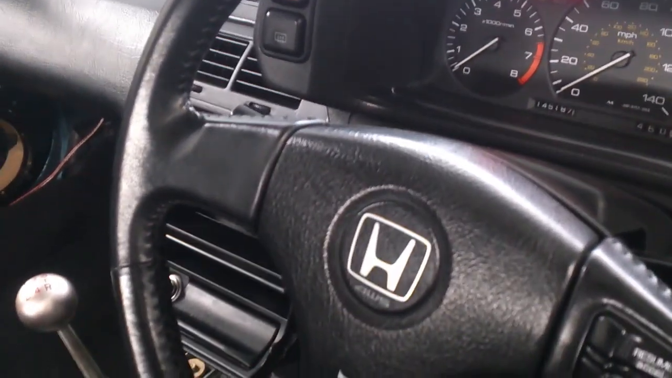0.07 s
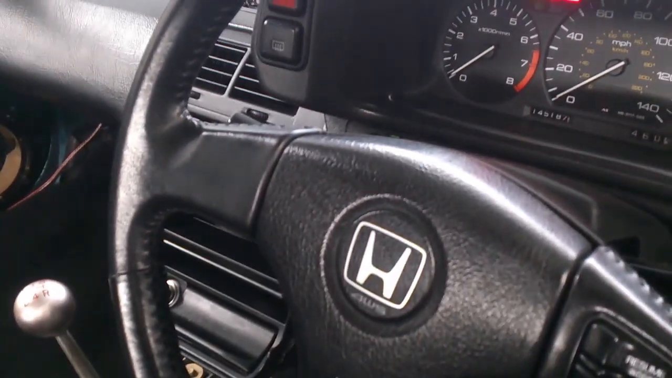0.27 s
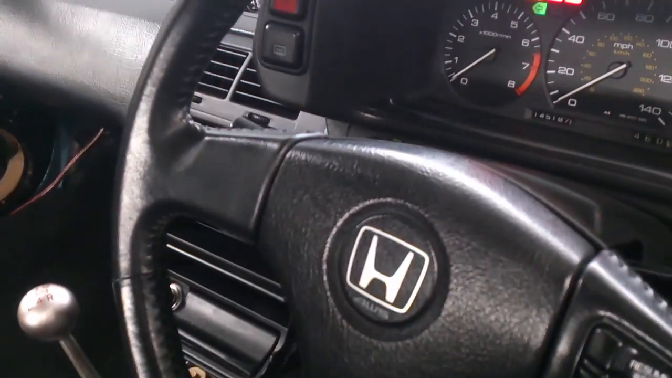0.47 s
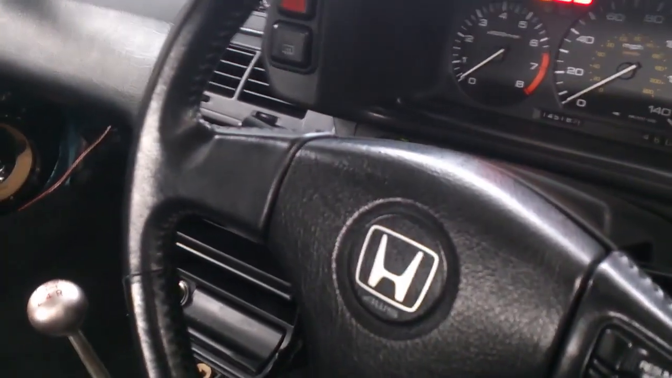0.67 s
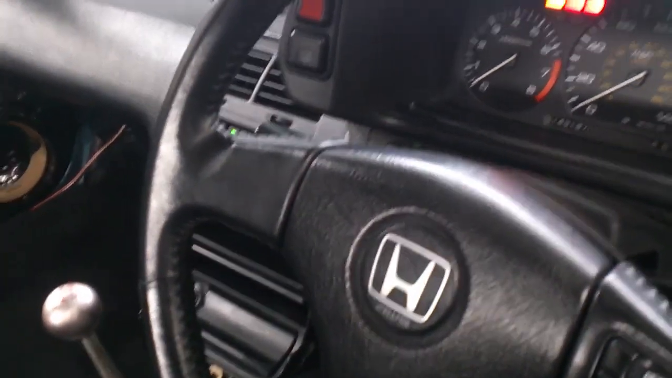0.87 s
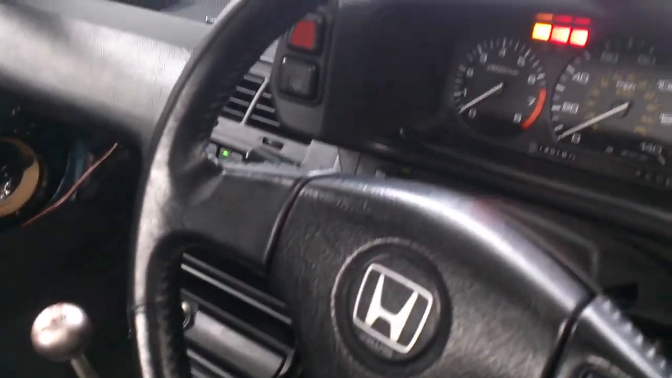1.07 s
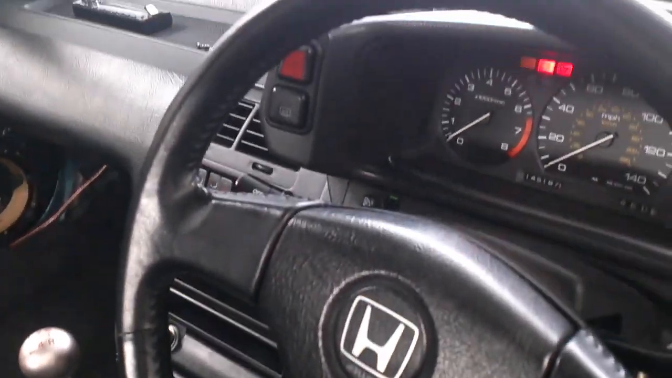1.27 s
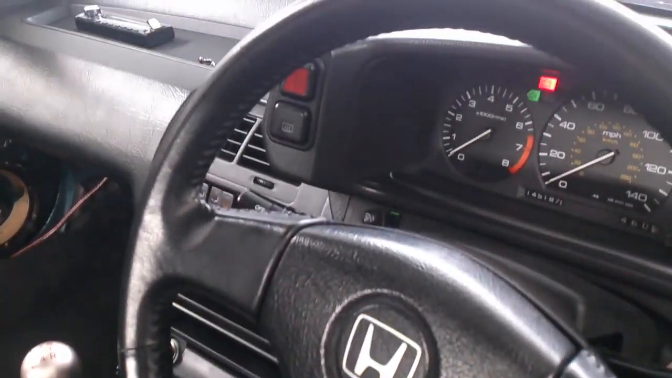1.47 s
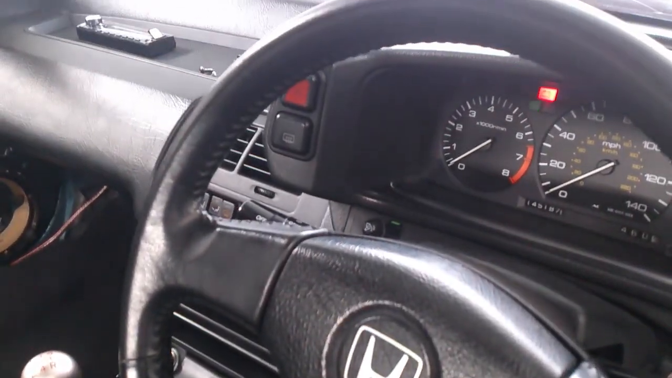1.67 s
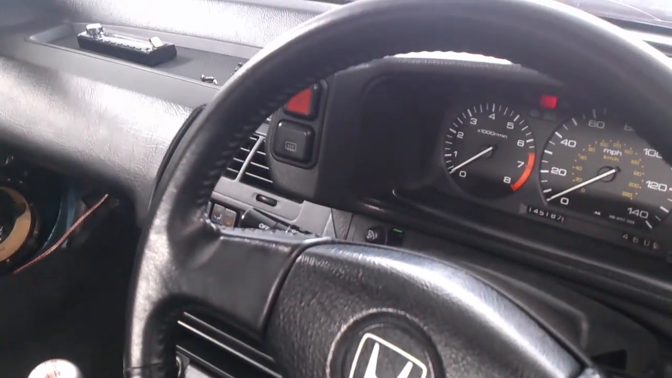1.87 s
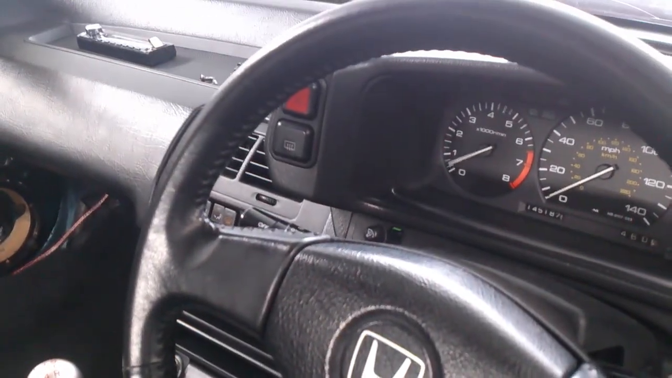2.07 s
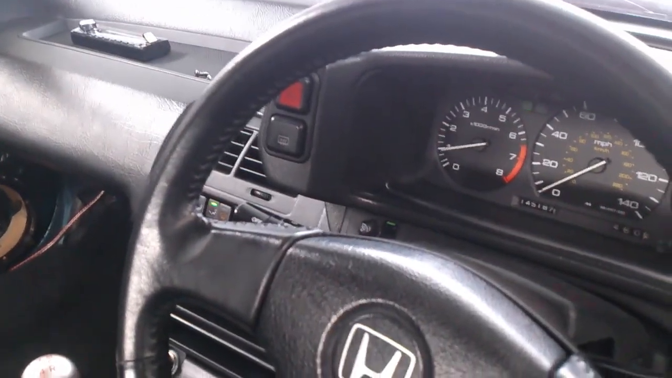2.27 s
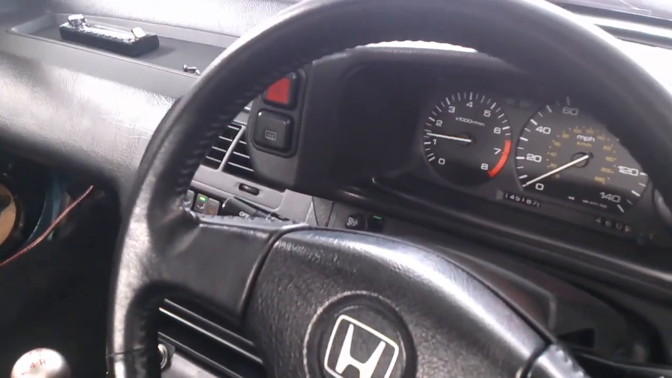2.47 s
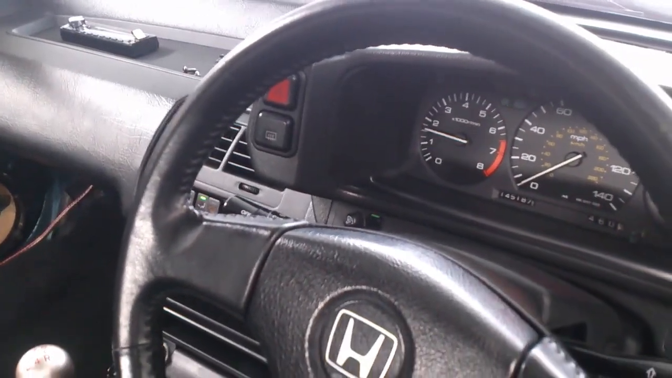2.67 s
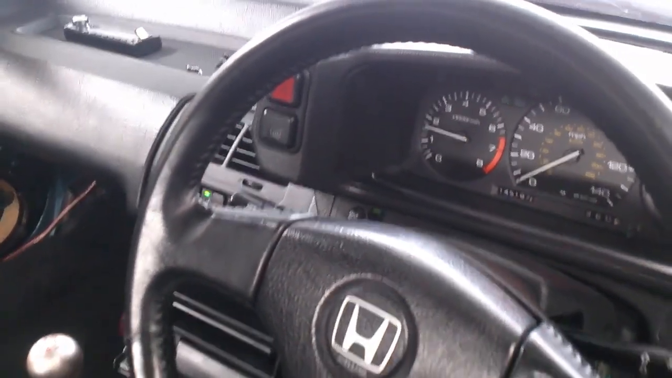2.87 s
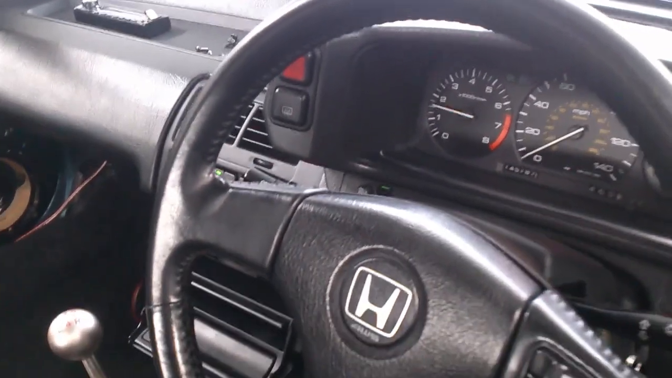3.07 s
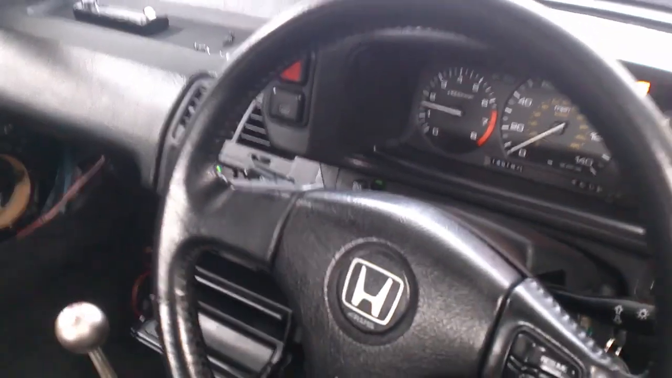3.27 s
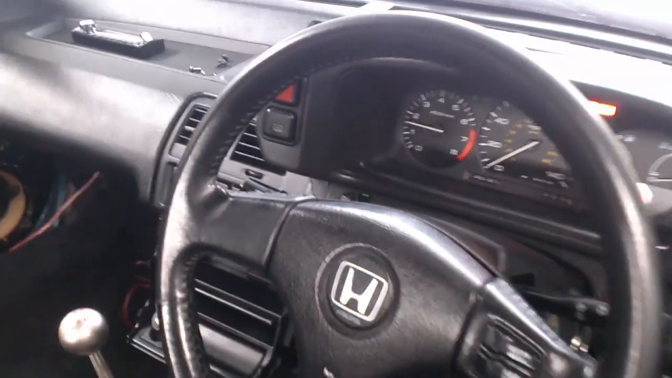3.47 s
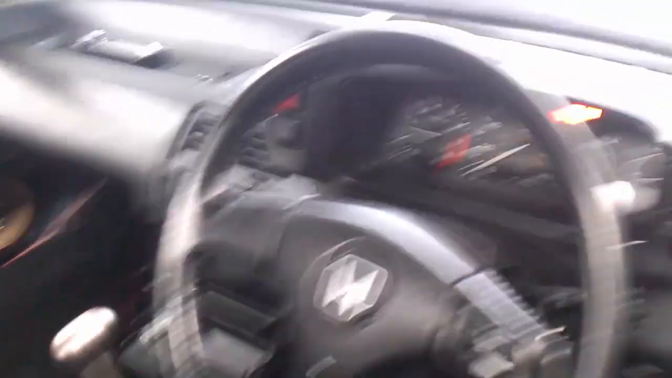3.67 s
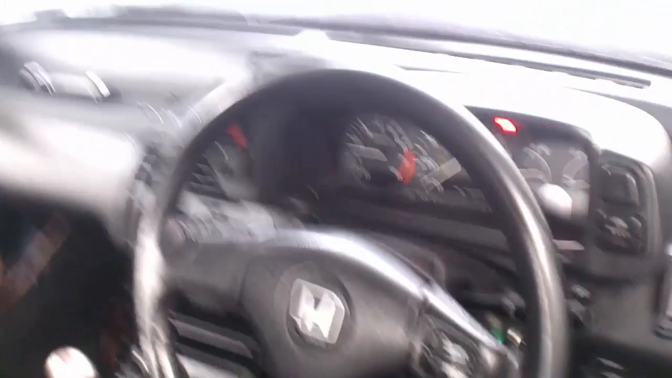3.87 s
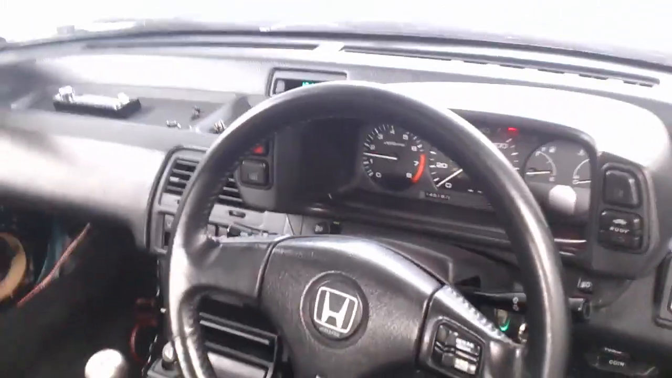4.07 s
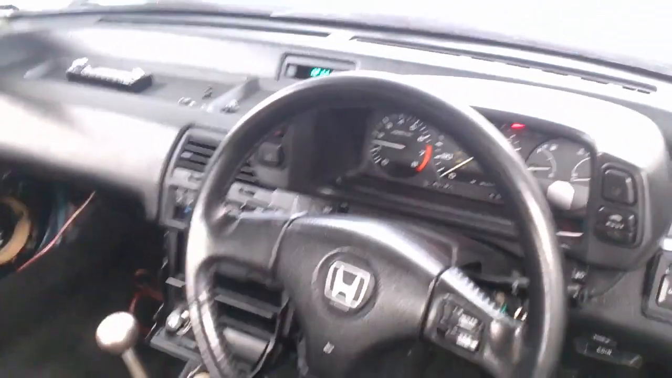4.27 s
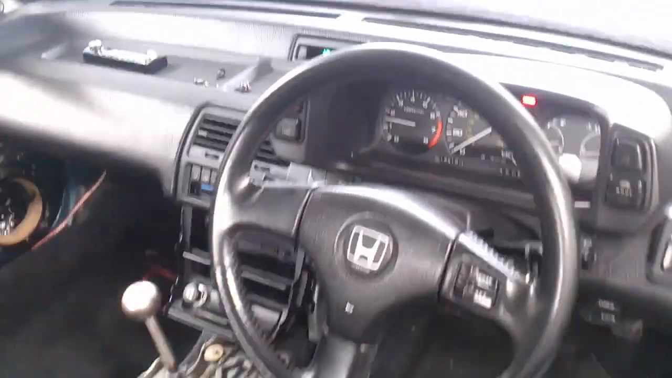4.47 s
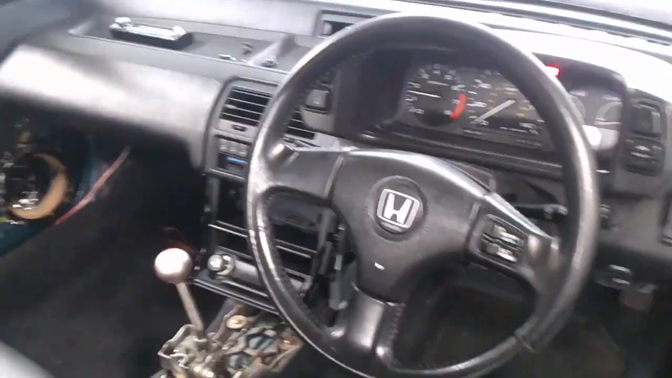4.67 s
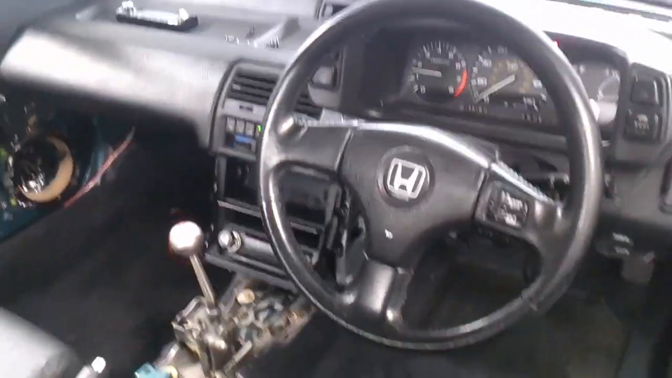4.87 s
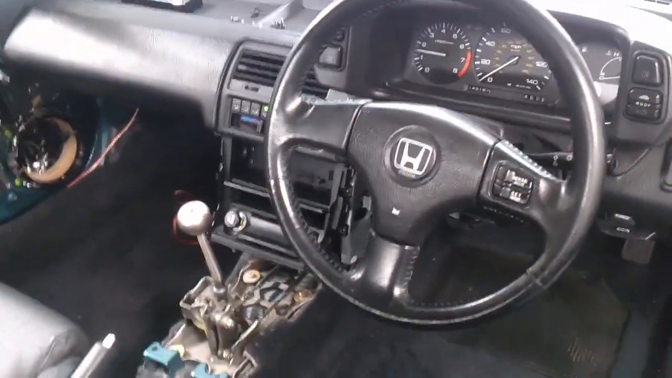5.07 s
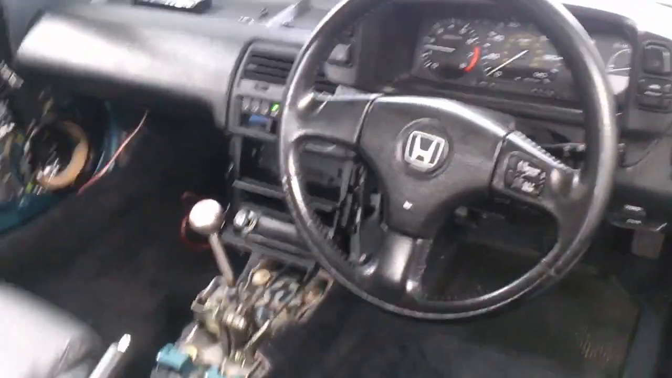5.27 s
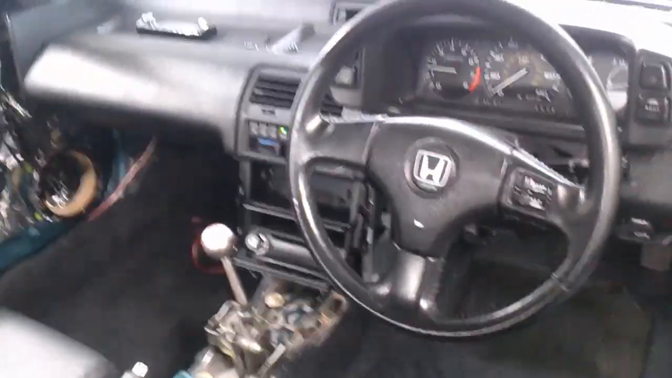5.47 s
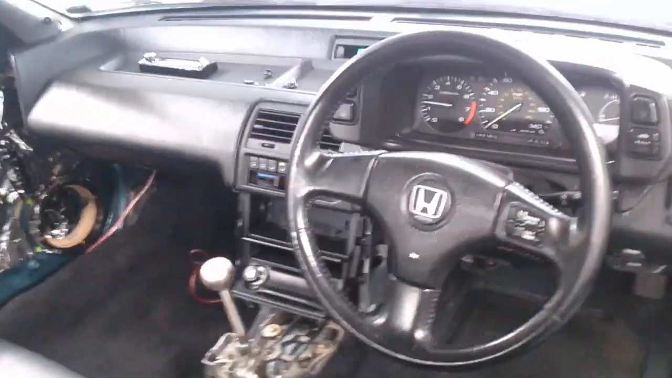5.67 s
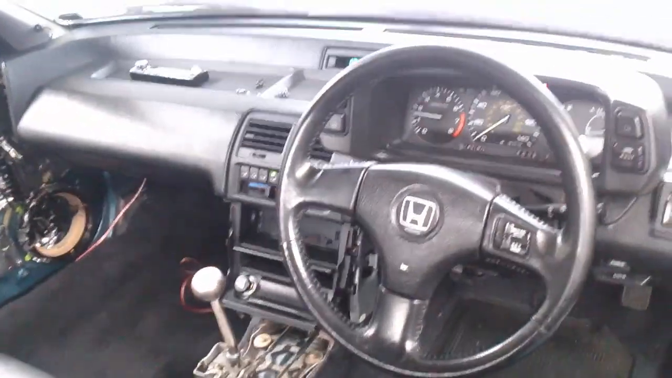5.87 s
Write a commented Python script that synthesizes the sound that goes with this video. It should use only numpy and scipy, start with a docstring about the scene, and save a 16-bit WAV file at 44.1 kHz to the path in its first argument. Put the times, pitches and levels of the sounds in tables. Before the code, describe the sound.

A key clicks, a starter cranks briefly, and a car engine stumbles, flares and settles into a booming fast idle, heard from inside.

```python
"""A key clicks round, a starter grinds through three compressions, and a cold four-cylinder petrol engine
stumbles, flares and settles into a booming fast idle. Driver's seat, hand-held stereo recorder, drawn back
from the dashboard during the idle. The firings pump the cabin air while exhaust and valves beat in step;
the starter's gear teeth whine and ring its housing. Close to the microphones, fingers knock and rub
on the recorder's case, over a faint hiss."""
import sys
import numpy as np
from scipy import signal
from scipy.fft import rfft, irfft, next_fast_len
from scipy.io import wavfile

SR = 44100
rng = np.random.default_rng(int(sys.argv[2]) if len(sys.argv) > 2 else 0)


def dump(signal):
    """Clip the signal to [-1, 1] and save it as 16-bit WAV at the path in sys.argv[1]."""
    limited = np.clip(np.atleast_2d(signal).T, -1, 1)
    pcm = np.round(limited * 32767).astype(np.int16)
    wavfile.write(sys.argv[1], SR, pcm)


N = 261511
TIME = np.arange(N) / SR

# the two microphone ports: (frequency [Hz], left minus right [dB], lead of the left [rad], likeness [0-1])
MIC_PORTS = [(24, 22, -1.5, 1), (54.3, 10, -1.08, 0.56), (113, 4, -1.04, 1), (202, 2, -1, 0.57),
             (470, 0.5, -0.2, 0.36), (1020, 1.5, -1.8, 1), (1930, -5, -2.5, 0), (4530, -6.5, -0.5, 0),
             (10600, -9, 2, 0), (16200, -11.5, 18, 1)]
# deep rumble of the rocking engine and of the case in the hand: (frequency [Hz], level [dB])
RUMBLE_SPECTRUM = [(4, -33), (11, -11), (18, -9), (28, 0), (45, -2.5), (70, -19), (130, -29.5), (300, -77)]
# strokes the starter labours through: (start [s], length [s], level [dB], whine [Hz], glide [Hz/s])
COMPRESSIONS = [(1.265, 0.11, -45.5, 883, 841), (1.43, 0.15, -44, 1584, -1100),
                (1.69, 0.065, -42.5, 1778, -3400)]

# phases of the start: (start [s], attack [s], hold [s], release t60 [s])
ENGAGE = (1.225, 0.017, 0.03, 0.19)   # the pinion bites
CRANK = (1.23, 0.044, 0.53, 0.76)     # the starter turns the engine
GULP = (1.729, 0.48, 0.023, 0.33)     # air rushes into the manifold
FLARE = (1.8, 0.15, 0.76, 2.1)        # the engine pulls hard, then eases to idle
STUMBLE = (1.877, 0.1, 0.3, 2.7)      # it fires unevenly
OVERRUN = (1.95, 0.38, 0.22, 0.59)    # it throws the starter off to spin down
# gradual changes: (start [s], length [s])
CATCH = (1.788, 0.25)       # the engine comes up to strength
DRAW_BACK = (3.3, 1.12)     # the recorder moves from the dashboard into the cabin
TONES_GROW = (4.38, 0.63)   # the steady tones of the idle come forward
LABOUR_T60_S = 0.26         # decay after each compression


def from_db(db):
    """Decibels to gain."""
    return 10 ** (np.asarray(db) / 20)


def rms_one(x):
    """Scale to rms 1."""
    return x / np.sqrt(np.mean(x ** 2) + 1e-20)


def together(*gains):
    """Unrelated vibrations add in power."""
    return np.sqrt(sum(gain ** 2 for gain in gains))


def ramp(start, length):
    """From 0 to 1 in a straight line."""
    return np.clip((TIME - start) / length, 0, 1)


def swell(start, attack, hold, t60):
    """Gain that rises, holds and dies away."""
    return ramp(start, attack) * from_db(-60 * np.maximum(TIME - start - attack - hold, 0) / t60)


def at_hz(rows, hz, column=1):
    """One column of a table, read on a log-frequency axis."""
    columns = np.transpose(rows)
    return np.interp(np.log(hz), np.log(columns[0]), columns[column])


def filtered(x, response):
    """Apply a frequency response, given as a function of Hz."""
    size = next_fast_len(N + 4096)
    hz = np.maximum(np.arange(size // 2 + 1) * SR / size, 1)
    return irfft(rfft(x, size) * response(hz), size)[..., :N]


def drift(rate_hz):
    """Random wander of rms 1, mostly slower than rate_hz."""
    return rms_one(filtered(rng.standard_normal(N), lambda hz: 1 / (1 + (hz / rate_hz) ** 2) ** 2))


def white():
    """Two unrelated white noises."""
    return rng.standard_normal((2, N))


def coloured(pair, spectrum):
    """Two unrelated signals given a spectrum, and made alike at the low end as in a small cabin; rms 1."""
    def weight(hz):
        alike = at_hz(MIC_PORTS, hz, column=3)
        return from_db(at_hz(spectrum, hz)) * np.sqrt([1 + alike, 1 - alike])
    mid, side = filtered(pair, weight)
    return rms_one(np.array([mid + side, mid - side]))


def wavering(angle, width_hz, steady):
    """A tone of rms 1: a steady core and a share that wanders in height and phase."""
    wander = drift(width_hz) * np.sin(angle) + drift(width_hz) * np.cos(angle)
    return np.sqrt(2 * steady) * np.sin(angle) + np.sqrt(1 - steady) * wander


def ring(x, hz, t60):
    """A damped resonance: a unit click sets a sine of height 1 ringing."""
    r, w = from_db(-60 / (t60 * SR)), 2 * np.pi * hz / SR
    return signal.lfilter([0, np.sin(w)], [1, -2 * r * np.cos(w), r * r], x + 1e-18)


def add(out, s, sound):
    """Mix a short sound in at time s."""
    at = round(s * SR)
    out[:, at:at + sound.shape[-1]] += sound[..., :N - at]


def engine():
    """The engine beyond the bulkhead; its firing angle makes one turn per firing."""
    # engine speed: (time [s], firing rate [Hz])
    speed = [(1.2, 7.5), (1.8, 9), (1.87, 17), (2.05, 20), (2.16, 27), (2.33, 33.5), (2.48, 49), (2.63, 55),
             (2.8, 54), (3.0, 51.4), (3.3, 50), (3.9, 49.4), (4.4, 50), (5.0, 51.4), (5.93, 51.7)]
    rate = np.interp(TIME, *np.transpose(speed))
    angle = 2 * np.pi * np.cumsum(rate) / SR
    body = cabin_boom(rate, angle) + shudder() + exhaust(angle)
    return body + valve_train(angle) + intake(angle) + block_drone(rate, angle)


def running(idle_db, flare_db=0, late_db=0, late=DRAW_BACK):
    """Gain of a part once the engine catches; the flare adds flare_db, the late change adds late_db."""
    return ramp(*CATCH) * from_db(idle_db + flare_db * swell(*FLARE) + late_db * ramp(*late))


def cycle_noise(angle, repeat=0.3, size=3400):
    """Noise of which a share comes back with every four firings; the rest is new each time."""
    pattern = rng.standard_normal((2, size))
    place_in_cycle = (angle / (8 * np.pi) % 1 * size).astype(int)
    return np.sqrt(repeat) * pattern[:, place_in_cycle] + np.sqrt(1 - repeat) * white()


def cabin_boom(rate, angle, overtone_db=-10.5):
    """Firings pump the cabin air; their rate and its overtones sweep through its resonances."""
    # the cabin's response at the seat: (frequency [Hz], gain [dB])
    cabin_air = [(14, 0), (20, -10), (32, -1), (39, -17), (45, 3.5), (52, 0.5), (57, -4.5), (99, -22),
                 (110, -7.5), (125, -10), (140, -6), (151, -17.5), (195, -43), (218, -15), (240, -10)]
    boom = from_db(at_hz(cabin_air, rate) + 0.17 * drift(3.8)) * np.sin(angle)
    for k in range(2, 5):
        boom += from_db(overtone_db + at_hz(cabin_air, k * rate) + 0.33 * drift(51)) * np.sin(k * angle)
    return running(idle_db=-22.5, flare_db=2.63, late_db=3.05) * np.sqrt(2) * boom


def shudder():
    """The engine rocks as it cranks, stumbles and runs; its mounts limit the swing."""
    rocking = together(from_db(-42.5) * swell(*CRANK), from_db(3) * strain(),
                       from_db(-22.5) * swell(*STUMBLE), running(idle_db=-48, flare_db=3.3))
    return rocking * 0.97 * np.tanh(coloured(white(), RUMBLE_SPECTRUM))


def exhaust(angle):
    """One puff of gas per firing, with a few hard thumps as the engine catches."""
    # the exhaust heard from inside: (frequency [Hz], level [dB])
    growl = [(50, 7), (90, 8.5), (140, 3), (210, -1.5), (330, -13), (460, -1), (620, -19), (1100, -27.5),
             (2500, -59)]
    # single hard firings: (time [s], level [dB])
    hard_firings = [(1.871, -39), (2.01, -30), (2.08, -49), (2.129, -40), (2.265, -53)]
    rate = np.gradient(angle) * SR / (2 * np.pi)
    throb_db = 0.99 * (50 / np.maximum(rate, 25)) ** 0.71   # the puffs stand further apart at low speed
    puffs = coloured(cycle_noise(angle), growl) * from_db(throb_db * (np.cos(angle) - 2.4))
    thump_gain = sum(from_db(db) * swell(s, attack=0.0076, hold=0, t60=0.18) for s, db in hard_firings)
    thumps = thump_gain * coloured(white(), growl)
    return running(idle_db=-48.5, flare_db=10.5, late_db=2.06) * puffs + thumps


def valve_train(angle):
    """Valve contacts clatter in step with the firings and the four-firing cycle."""
    # the clatter at the seat: (frequency [Hz], level [dB])
    clatter = [(110, -36), (180, -29), (231, -4.5), (303, 0.5), (382, -7), (420, -5), (491, -6.5),
               (768, -4), (840, -7.5), (1080, 0), (1360, -10.5), (2130, -11), (6700, -33), (9940, -33),
               (13000, -38.5)]
    beat_db = 0.29 * np.cos(angle) + 0.2 * np.cos(2 * angle) + 0.14 * np.cos(angle / 4)
    contacts = from_db(beat_db + 0.79 * drift(57)) * cycle_noise(angle)
    return running(idle_db=-45, late_db=3) * coloured(contacts, clatter)


def intake(angle):
    """Air hisses into the manifold: one gulp, then a draw that pulses with the firings."""
    # rushing air: (frequency [Hz], level [dB])
    rush = [(300, -19), (900, -5), (2000, -5.5), (3500, -11.5), (5500, -11.5), (7500, -21.5), (11000, -14),
            (15500, -25)]
    airflow = together(running(idle_db=-62.5, flare_db=4.7, late_db=-1.5), from_db(-46) * swell(*GULP))
    return airflow * from_db(0.82 * np.sin(angle)) * coloured(white(), rush)


def block_drone(rate, angle, panel_hz=433, panel_width_hz=28):
    """The block and its accessories sing at multiples of the firing rate; a panel lifts tones near it."""
    # engine tones: (multiple of the firing rate, level [dB])
    orders = [(5, -6), (5.5, -11), (6, 0), (7, -11), (8, 2), (8.5, -9), (9, -2), (10, -10), (11, -4),
              (15, -8), (18, -10), (19.5, -7), (21, -6), (21.25, -6), (21.5, -9), (39, -13), (40.5, -13),
              (42, -15)]
    tilt_db_per_octave = -5 + 1.6 * swell(*FLARE) + 9.1 * ramp(*TONES_GROW)
    tones = 0
    for k, db in orders:
        panel_db = 3 / (1 + (2 * (k * rate - panel_hz) / panel_width_hz) ** 2)   # a cabin panel rings
        gain = from_db(db + tilt_db_per_octave * np.log2(k / 8) + panel_db)
        tones += gain * wavering(k * angle, width_hz=5, steady=0.95)
    return running(idle_db=-65, flare_db=9.2, late_db=7.1, late=TONES_GROW) * tones


def starter_whine(attack_s=0.036):
    """The gears sing out on each compression and on the overrun; backlash roughens them to a whirr."""
    # mesh tones: (multiple of the whine, level [dB])
    mesh_tones = [(.19, -14.5), (0.381, -15), (1, 1), (1.171, -11), (2.05, 1.5)]
    # what the bulkhead lets through to the seat: (frequency [Hz], gain [dB])
    bulkhead = [(170, -3.5), (270, 0), (900, 3), (1500, 0), (2000, -2.5), (2450, 1.5), (2900, -17),
                (6000, -32)]
    angle = 2 * np.pi * np.cumsum(gear_pitch()) / SR
    whirr = 0
    for k, db in mesh_tones:
        whirr += from_db(db) * np.array([wavering(k * angle, width_hz=140, steady=0.15) for _ in "LR"])
    whirr = filtered(whirr, lambda hz: from_db(at_hz(bulkhead, hz)))
    labour = sum(from_db(db) * swell(s, attack_s, length - attack_s, LABOUR_T60_S)
                 for s, length, db, _, _ in COMPRESSIONS)
    return (labour + from_db(-54.5) * swell(*OVERRUN)) * whirr


def gear_pitch(overrun_hz=2400, fall_hz_per_s=750):
    """The whine glides through each compression, then falls steadily as the starter spins down."""
    hz = np.full(N, COMPRESSIONS[0][3], float)
    for s, length, _, start_hz, glide in COMPRESSIONS:
        hz = np.where(TIME > s, start_hz + glide * np.minimum(TIME - s, length), hz)
    freed_s = TIME - OVERRUN[0]
    return np.where(freed_s > 0, np.maximum(overrun_hz - fall_hz_per_s * freed_s, 0), hz)


def strain(lag_s=0.0064):
    """Gain of the load on the gears, which builds to a peak just after each compression ends."""
    return sum(from_db(db) * swell(s, length + lag_s, 0, LABOUR_T60_S)
               for s, length, db, _, _ in COMPRESSIONS)


def starter_grind():
    """The gear teeth scrape, harder on each compression, and ring the housing."""
    # scraping teeth: (frequency [Hz], level [dB])
    tooth_spectrum = [(88, -42), (150, -42), (643, -3), (827, -10), (912, -7), (1270, 6.5), (1450, -3),
                      (1870, -8.5), (2310, 4), (2600, -7.5), (11600, -23), (15500, -24)]
    # resonances of starter housing and bulkhead: (frequency [Hz], width [Hz], level [dB])
    housing_modes = [(285, 40, -6), (447, 16, 1), (610, 40, -7), (907, 24, 2), (1005, 45, -1),
                     (1110, 80, -2), (1430, 28, -1), (1526, 32, -1), (1680, 55, -3), (1952, 20, 1),
                     (2006, 20, 0), (2240, 35, -3), (2300, 40, -3), (2850, 200, -10), (3400, 150, -14)]
    def housing(hz):
        return sum(from_db(db) / (1 + 2j * (hz - f) / width) for f, width, db in housing_modes)
    scraping = white() * from_db(0.63 * drift(145))
    teeth = from_db(-0.5) * coloured(scraping, tooth_spectrum)
    ringing = from_db(3.5) * rms_one(filtered(scraping, housing))
    load = together(from_db(-42.5) * swell(*ENGAGE), from_db(-54.5) * swell(*CRANK),
                    from_db(-1.5) * strain(), from_db(-58) * swell(*OVERRUN))
    return load * (teeth + ringing)


def clack(t, hz, t60):
    """A struck loose part: its main ring, just under hz, and weaker neighbours."""
    # neighbouring modes: (multiple of the nominal pitch, level [dB], longest t60 [s])
    neighbours = [(.36, -9.5, 0.025), (.62, -15, 0.046), (1.042, -5.5, 0.23), (1.2, -4, 0.032),
                  (2.1, -13, 0.021)]
    tone = 0
    for k, db, decay in [(0.96, 0, t60)] + neighbours:
        phase = rng.uniform(0, 2 * np.pi)
        tone += from_db(db - 60 * t / min(decay, t60)) * np.sin(2 * np.pi * k * hz * t + phase)
    return tone


def clicks(cabin_t60=0.17, cabin_db=3.5, tick_t60=0.11):
    """Small parts around the dashboard tick and ring, each at its own pitch; the cabin scatters them."""
    # key, relays, solenoid and trim: (time [s], level [dB], nominal pitch [Hz], t60 [s], brightness [dB])
    parts = [(.2, -48.5, 560, 0.061, -17), (.208, -38.5, 600, 0.025, -14), (0.258, -45.5, 990, 0.033, -12),
             (0.269, -40, 874, 0.023, -6), (0.349, -44, 1102, 0.2, -24), (0.469, -54, 693, 0.072, 9),
             (0.525, -51.5, 590, 0.022, -1), (.53, -53.5, 915, .04, 0), (1.111, -51, 585, 0.018, -15),
             (1.181, -52, 583, 0.06, -1), (1.232, -52, 1050, 0.038, 13.5), (2.6, -32, 624, 0.059, -20),
             (2.619, -38.5, 570, 0.038, -19), (4.372, -34.5, 1000, 0.014, -7.5)]
    out, t = np.zeros((2, N)), TIME[:SR // 3]
    tick_band = signal.butter(2, [500, 3800], "band", fs=SR, output="sos")
    for s, db, hz, t60, bright_db in parts:
        echoes = rng.standard_normal((2, len(t))) * from_db(-60 * t / cabin_t60)
        direct = clack(t, hz, t60)
        scattered = signal.fftconvolve(echoes / np.linalg.norm(echoes[0]), direct[None])[:, :len(t)]
        tone = from_db(-0.5) * (direct + from_db(cabin_db) * scattered)
        tick = rms_one(signal.sosfilt(tick_band, rng.standard_normal((2, len(t)))))
        tick *= from_db(bright_db - 8 - 60 * t / tick_t60)
        add(out, s, from_db(db) * (tone + tick))
    return out


def case_knocks():
    """Fingers knock the recorder's case and ring it, right at the microphones and towards the left."""
    # finger blows: (time [s], strength [dB], contact cut-off [Hz])
    knocks = [(3.8026, -14, 1098), (3.806, -31, 9000), (3.821, -9.5, 4500), (3.843, -15.5, 600)]
    # modes of the case: (frequency [Hz], level [dB], t60 [s])
    case_modes = [(550, -47, 0.0069), (1200, -3, 0.0059), (2160, -17, 0.0066), (3050, -6.5, 0.0035),
                  (3400, -19.5, 0.0071), (8050, -15, .002), (10900, -32, .002)]
    blows = np.zeros((1, N))
    for s, db, contact_hz in knocks:
        softness = np.exp(-2 * np.pi * contact_hz / SR)
        add(blows, s, from_db(db) * (1 - softness) * softness ** np.arange(SR // 100))
    ringing = sum(ring(blows * from_db(db), hz, t60) for hz, db, t60 in case_modes)
    return ringing * from_db([[4], [-4]])


def jingle_and_rubs():
    """A short, high tick of jingling keys, then fingers stick and slip over the case; slightly right."""
    # friction: (frequency [Hz], level [dB])
    friction_spectrum = [(800, -7), (1700, 8), (2800, 8), (4300, 0), (6500, -54), (10000, -20),
                         (15500, -45)]
    # key tick (the 13 kHz row) and finger rubs:
    # (centre [s], length [s], level [dB], squeak [Hz], squeak over friction [dB], sharpness [Q])
    contacts = [(0.286, 0.054, -61.5, 1300, 5, 7.2), (0.258, .006, -63, 13000, 14.5, 2),
                (3.821, 0.0035, -34.5, 10800, -7, 0.96), (3.88, 0.055, -57.5, 5950, -0.5, 1.7),
                (3.927, 0.0051, -54.5, 3200, 9, 2.9), (3.973, 0.064, -53.5, 3950, 6, 4.6),
                (3.977, 0.059, -63.5, 9400, 9.5, 5.3), (4.903, 0.075, -55, 9500, -6.5, 1.6),
                (5.104, 0.017, -57, 2660, 10.5, 15), (5.121, 0.054, -53.5, 2260, 12.5, 5.1)]
    slips = white() * from_db(1.8 * drift(390))
    friction = coloured(slips, friction_spectrum)
    out = 0
    for s, length, db, hz, squeak_db, sharpness in contacts:
        squeak = rms_one(signal.lfilter(*signal.iirpeak(hz, sharpness, fs=SR), slips))
        touch = from_db(db) * np.exp(-2 * ((TIME - s) / length) ** 2)
        out += touch * (friction + from_db(squeak_db) * squeak)
    return out * from_db([[-2], [2]])


def background(whistle_hz=9718):
    """Hiss, electronic whistle and hand rumble start louder and drop after a third of a second;
    the key scrapes meanwhile."""
    # hiss: (frequency [Hz], level [dB])
    hiss_spectrum = [(35, -30), (60, 2.5), (163, -12.5), (351, -10.5), (756, -18.5), (910, -17),
                     (3500, -22.5), (4960, -25), (5980, -26), (7720, -30.5), (9740, -17.5), (11700, -23.5),
                     (15500, -27.5)]
    # dull scrape of the key in its barrel: (frequency [Hz], level [dB])
    scrape_spectrum = [(40, -14), (90, 3), (180, -6), (350, -3.5), (600, -13.5), (1500, -24), (5000, -45)]
    opening_swell = swell(start=-0.102, attack=0.1, hold=0.338, t60=0.2)
    hiss_gain = together(from_db(-62 + 1.5 * ramp(*DRAW_BACK)), from_db(-53.5) * opening_swell)
    rumble_gain = together(from_db(-62.5), from_db(-47.5) * opening_swell)
    whistle = from_db(-7.5 + 2.2 * drift(33)) * np.sin(2 * np.pi * whistle_hz * TIME)
    scrape = from_db(-61) * opening_swell * coloured(white(), scrape_spectrum)
    hiss = hiss_gain * (coloured(white(), hiss_spectrum) + whistle * [[0], [1]])   # whistle on the right
    return hiss + rumble_gain * coloured(white(), RUMBLE_SPECTRUM) + scrape


def scene():
    """Everything heard in the driver's seat."""
    car = engine() + starter_whine() + starter_grind() + clicks()
    return car + case_knocks() + jingle_and_rubs() + background()


def record(dry, cutoff_hz=15800, fade_s=0.006):
    """The left port favours the bass and lags a little, the right favours the treble; the top is cut."""
    def ports(hz):
        balance_db, lead = at_hz(MIC_PORTS, hz), at_hz(MIC_PORTS, hz, column=2)
        left = from_db(balance_db / 2) * np.exp(1j * lead / 2)
        return np.array([left, 1 / left])
    fade_out = np.minimum((TIME[-1] - TIME) / fade_s, 1)
    top_cut = signal.ellip(12, 0.1, 80, cutoff_hz, fs=SR, output="sos")
    return signal.sosfilt(top_cut, filtered(dry * fade_out, ports))


dry = scene()
out = record(dry)
dump(out)
```